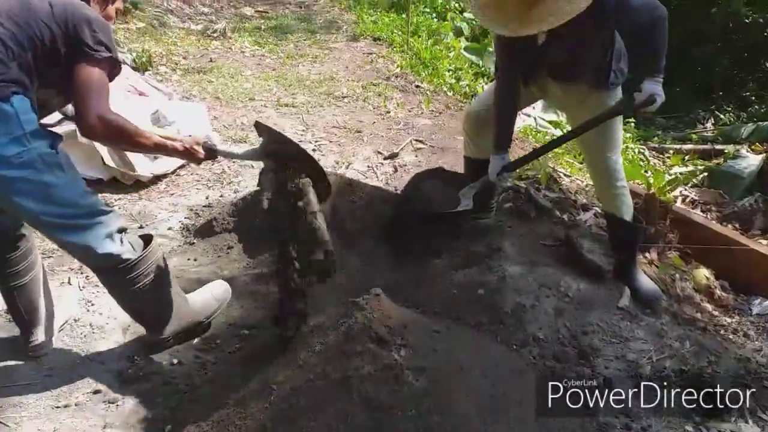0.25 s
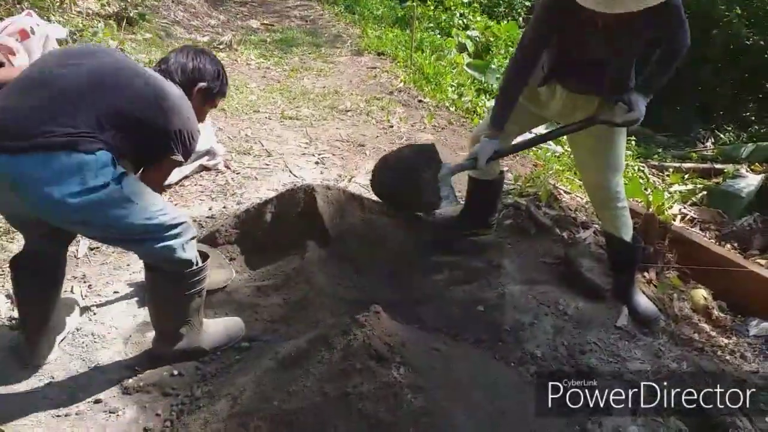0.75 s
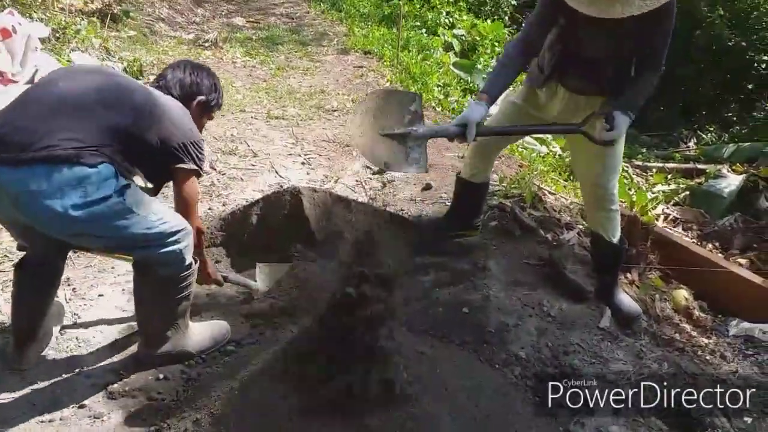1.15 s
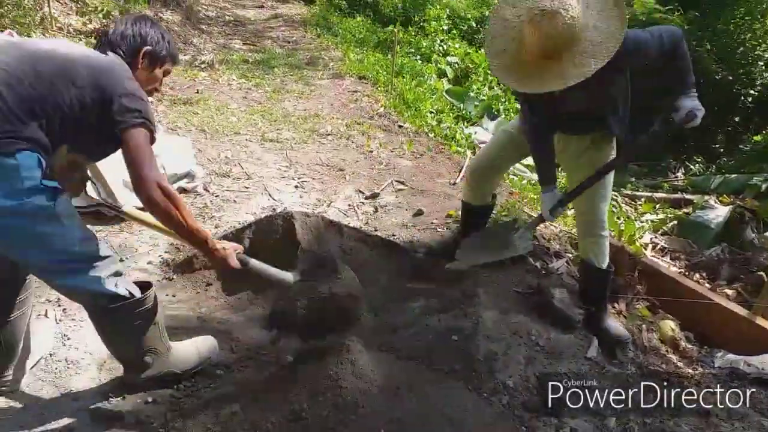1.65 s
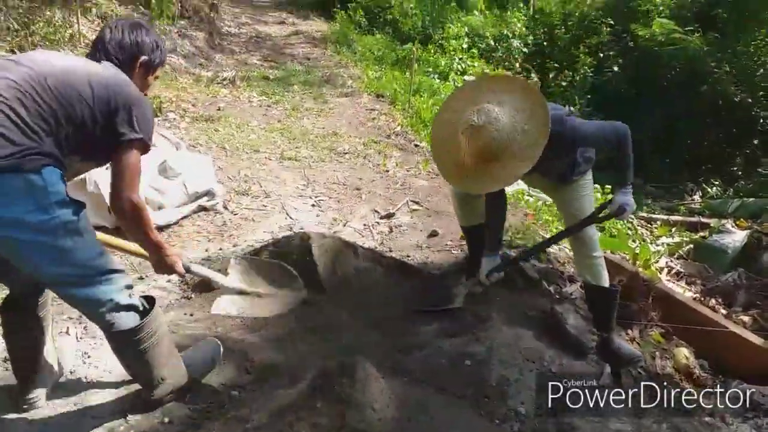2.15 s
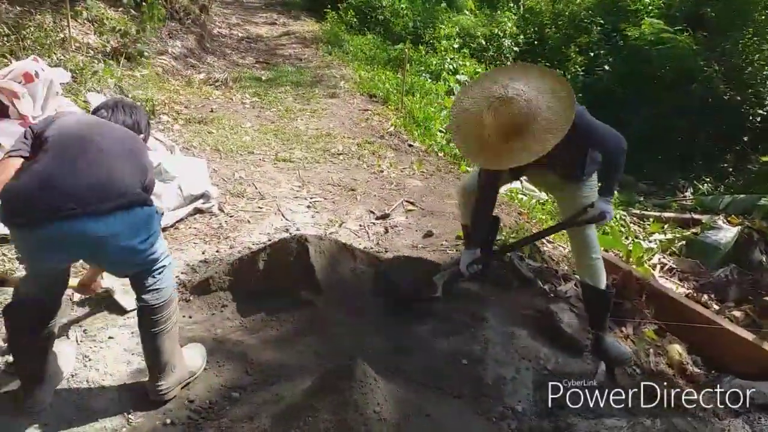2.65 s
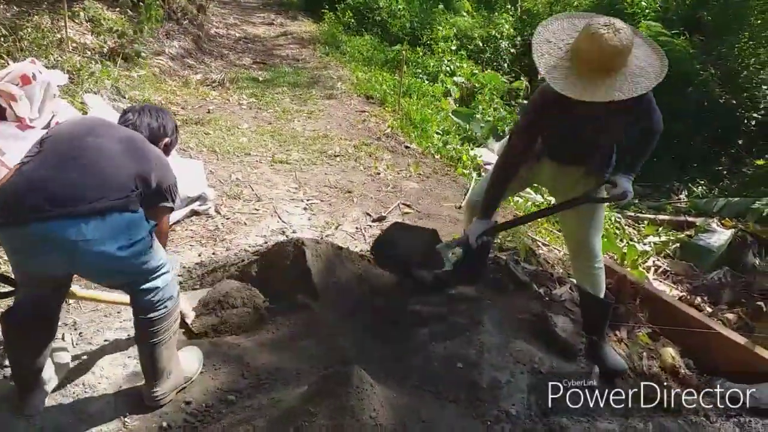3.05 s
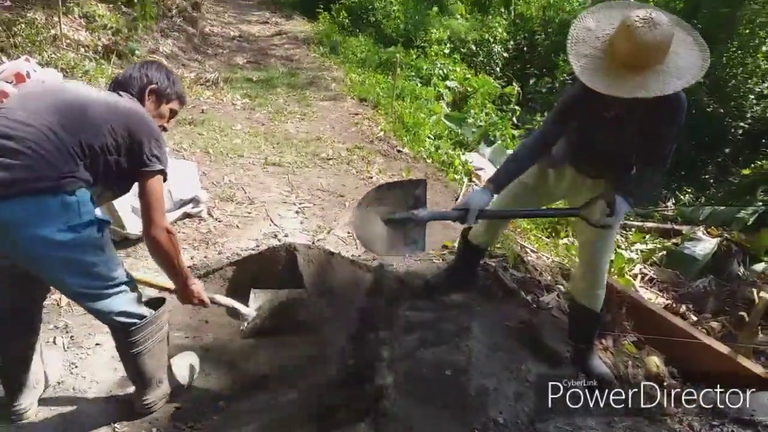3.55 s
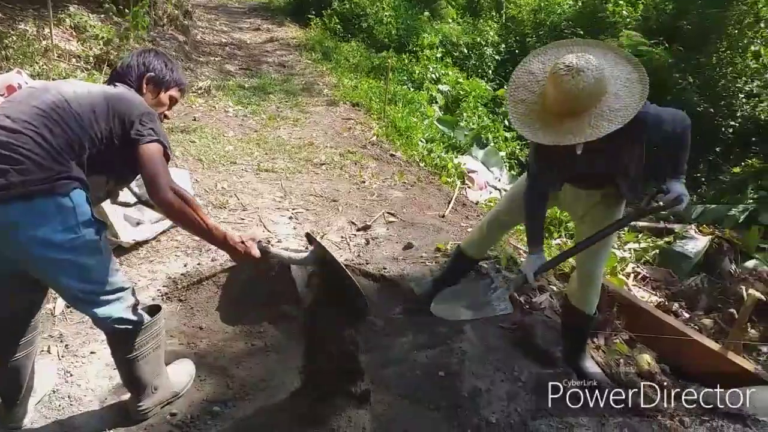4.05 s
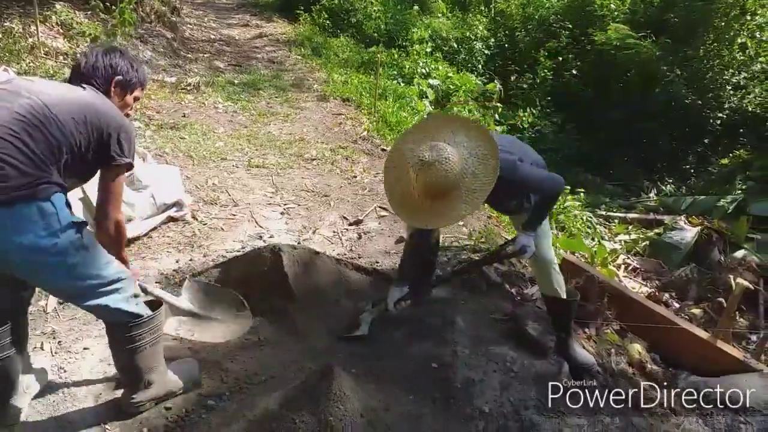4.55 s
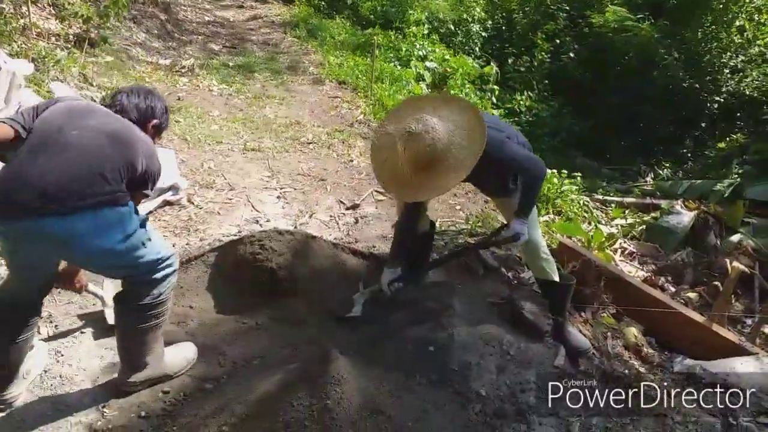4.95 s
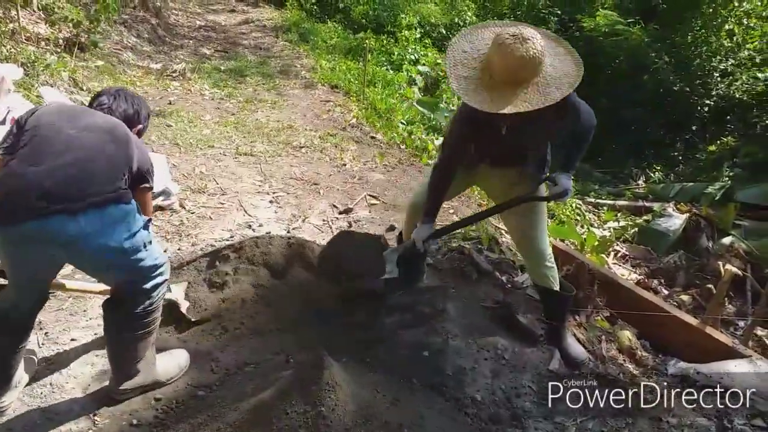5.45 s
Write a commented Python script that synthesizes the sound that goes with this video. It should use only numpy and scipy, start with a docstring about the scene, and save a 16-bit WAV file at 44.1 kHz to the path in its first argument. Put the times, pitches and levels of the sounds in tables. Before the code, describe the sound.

Open air, close microphone, almost no echo. A steady insect hiss with a shriller layer, strongest early and sinking in pitch around 1.5 s, lies over soft air and a faint low engine hum. Soft thuds and a little spilling sand open the scene, with thin wavering bird whistles at 0.4-1.1 s. At 0.9 s a steel shovel bites into gritty sand: a short bright crunch with hard jolts. Thuds and trickles follow to 1.8 s. A second, longer scrape grinds from 1.9 to 2.3 s, swelling and cutting off quickly, with a sharp bird chirp near 2.0 s. Boots shuffle, then a brief scrape comes at 2.75 s. Grit rattles lightly off the blade at 3.1-3.5 s, followed by soft thuds and quiet. A strong, clanking scrape lands at 4.4-4.7 s, high bird chirps at 4.8 s, and a last gritty, ringing push at 4.95-5.3 s before insects remain.

```python
"""Two workers turn a heap of dry sand and cement outdoors with steel shovels.
Insects hiss as filtered noise, air moves and a far engine hums as a sine; soft thuds and spilling sand open the
scene, and faint birds whistle as wavering sines. Then come five pushes, the last two close together: each
blade bites, grinds over random grains that drive its steel modes, and catches on stones with sudden jolts.
Between them loads thud and trickle, boots shuffle, grit rattles off a raised blade and more birds call."""
import sys
import numpy as np
from scipy import signal
from scipy.fft import rfft, irfft, next_fast_len
from scipy.io import wavfile
from scipy.ndimage import uniform_filter1d, map_coordinates

SR = 44100
rng = np.random.default_rng(int(sys.argv[2]) if len(sys.argv) > 2 else 0)


def persist_wave(psi):
    """Save psi, clipped to +-1, as 16-bit WAV."""
    counts = np.round(np.clip(psi, -1, 1) * 32767).astype(np.int16)
    wavfile.write(sys.argv[1], SR, np.atleast_2d(counts).T)


N = 251811

# Motion and relative drive of each push of a blade; brightness applies at the deepest point:
# touch_s, dig_s, deepest_s, lift_s, skim_db, grind_db, sand_db, bright_db, brightening_db_per_s, release_db_per_s
STROKES = [(0.924, 0.941, 1.007, 1.075, -39.5, -29.5, -39, 3, -7, 94),
           (1.924, 2.075, 2.278, 2.337, -40.5, -28.5, -45.5, 0.5, 28, 207),
           (2.733, 2.769, 2.866, 2.817, -59, -28, -41.5, -2.5, 11, 109),
           (4.429, 4.484, 4.558, 4.678, -39, -25, -46, -4.5, 17, 205),
           (4.954, 5.071, 5.181, 5.262, -39.5, -29, -45.5, -7.5, -9, 222)]
# Spectrum of shoved, falling and trodden sand: frequency_hz, density_db
SAND_SPECTRUM = [(82, -62), (140, -8.5), (426, -2.5), (472, 1.5), (586, -4), (715, -4), (864, -10.5),
                 (1100, -7.5), (1430, -27), (2420, -120)]


def amp(db):
    """Decibels to amplitude ratio: 20 dB is a factor of ten."""
    return 10 ** (np.asarray(db) / 20)


def unit(x):
    """Normalise to a root-mean-square of 1."""
    return x / np.sqrt(np.mean(x ** 2) + 1e-20)


def curves(rows):
    """Linear interpolation in time: one curve for each column after the first."""
    s, *columns = np.transpose(rows)
    return [np.interp(np.arange(N) / SR, s, column) for column in columns]


def wobble(rate, size=N):
    """Band-limited random fluctuation: a smooth curve through `rate` random knots a second."""
    knots = rng.standard_normal(int(size * rate / SR) + 4)
    return map_coordinates(knots, [np.arange(size) * rate / SR])


def filtered(x, response):
    """Linear filtering: the spectrum of x times a response to frequency in Hz."""
    size = next_fast_len(len(x) + 8192)
    hz = np.fft.rfftfreq(size, 1 / SR)
    return irfft(rfft(x, size) * response(hz), size)[:len(x)]


def coloured(x, spectrum):
    """Spectral shaping: x weighted by (Hz, dB) points on a log-frequency axis, at rms 1."""
    f, db = np.transpose(spectrum)
    return unit(filtered(x, lambda hz: amp(np.interp(np.log(hz + 1), np.log(f), db))))


def tail(x, t60):
    """Diffuse decay: convolution with noise that falls 60 dB in t60 seconds, at unit energy."""
    t = np.arange(SR // 3) / SR
    response = rng.standard_normal(len(t)) * amp(-60 * t / t60)
    return signal.fftconvolve(x, response / np.linalg.norm(response))[:N]


def shovels():
    """Superposition: two blades push in turn, each push with its own excitation and modes."""
    # tone of each push, set by the blade's angle and depth: frequency_hz, density_db
    tone_1 = [(590, -58), (1000, -37), (1230, -12.5), (1640, 0.5), (1860, -1), (2280, -11), (2450, -3),
              (3220, -6), (4240, -1.5), (4980, -5), (7270, -2), (8250, -17), (9470, -19.5), (12300, -12),
              (15500, -10.5)]
    tone_2 = [(470, -32), (800, -13.5), (1030, -22), (1280, -9.5), (1880, -7), (2030, -5.5), (2800, -2.5),
              (3130, -2.5), (4830, -0.5), (6840, -4), (8650, -23), (12600, -4.5), (15500, -20)]
    tone_3 = [(590, -35), (1000, -30), (1290, -26), (1920, -6.5), (2110, -14), (2310, -8.5), (3220, -7),
              (3530, -9.5), (4870, -2.5), (6190, 0), (8940, -22.5), (13400, -8.5), (15500, -22)]
    tone_4 = [(410, -46), (700, -21), (943, -13), (1020, -15), (1190, -12), (1500, -9), (1780, -4),
              (2310, -4.5), (2800, -1.5), (3400, -8.5), (4080, -2), (6680, -4), (8880, -22), (12100, -5.5),
              (15500, -19)]
    tone_5 = [(470, -33), (800, -5), (1310, -11), (1640, -6), (1810, 3.5), (2210, -8), (2630, -6.5),
              (3170, -5), (4010, 1), (4370, -0.5), (6270, -10.5), (7550, -21.5), (9210, -23),
              (12700, -14.5), (15500, -28)]
    # modes of the two steel blades, levels before ring_db is added: frequency_hz, width_hz, level_db
    blade_a = [(1676, 51, 8), (1780, 43, -35), (1927, 64, -1), (2440, 63, 8), (2710, 52, 4), (2900, 79, 4),
               (3410, 46, -13), (4230, 53, 3.5), (4670, 38, -7), (4800, 55, -2), (4860, 45, -8),
               (5360, 44, -6), (5530, 41, 10), (5980, 90, 3.5), (6900, 67, -13)]
    blade_b = [(973, 28, 7), (1190, 32, 1), (1310, 10, -41), (1746, 56, 5), (2020, 60, 4), (2290, 26, -6),
               (2820, 82, -14), (3132, 23, 8.5), (3270, 36, -11), (3820, 89, -6.5), (4000, 78, -19),
               (4660, 40, -21), (5400, 100, 7), (5350, 140, -7), (6030, 130, -2), (6500, 50, -16)]
    return (push(0, tone_1, blade_a, catch_db=-4.5, ring_db=-9.5, heave_db=-10, flex=0.037, low_db=-2)
            + push(1, tone_2, blade_b, catch_db=-4, ring_db=-6, heave_db=-17.5, flex=0.018, low_db=0.0)
            + push(2, tone_3, blade_a, catch_db=-2.5, ring_db=-13, heave_db=-32, flex=0.055, low_db=-0.8)
            + push(3, tone_4, blade_b, catch_db=-4.5, ring_db=-10.5, heave_db=-21.5, flex=0.15, low_db=0.7)
            + push(4, tone_5, blade_a, catch_db=-3.5, ring_db=-5.5, heave_db=-16, flex=0.47, low_db=-0.7)
            + chatters())


def push(index, tone, blade, catch_db, ring_db, heave_db, flex, low_db):
    """Stick-slip friction: the load on the grit drives the steel's modes and shoves sand ahead."""
    buried, grind, shove, brightness = stroke(index)
    jolt = amp(catch_db) * jolts(index)
    load = np.hypot(grind, jolt)
    slip = amp(1.15 * wobble(60) + 0.84 * wobble(320))

    grains = wandering(coloured(grit(per_second=7000, spread_db=2), tone), depth_db=1.5)
    fine = filtered(grains, lambda hz: 1 / (1 + (5000 / (hz + 1)) ** 12))  # above 5 kHz
    low = filtered(grains, lambda hz: 1 / (1 + (hz / 2300) ** 12))  # below 2.3 kHz
    # a heavier load drives the plate's low modes more
    bending = amp(low_db) * (load / grind.max() + 1e-6) ** flex
    coarse = (grains - fine + (bending - 1) * low) / np.std(grains - fine)
    crunch = coarse + brightness * unit(fine)  # faster sliding cracks more fine grains

    steel = ring(load * slip * crunch, blade, ring_db)
    steel = amp(-1.0) * steel + amp(-7) * tail(steel, t60=0.076)  # the plate's many weak modes
    weight = np.hypot(shove, amp(heave_db) * jolt * buried) * slip  # a jolt in the sand also shakes the load
    return steel + weight * coloured(grit(per_second=2500, spread_db=1), SAND_SPECTRUM)


def stroke(index):
    """Force follows depth: skimming, digging in and lifting set gains of grinding, sand and fine grains."""
    touch, dig, deepest, lift, skim_db, grind_db, sand_db, bright_db, brightening, release = STROKES[index]
    dig_s = 0.0053  # time to make contact, and again to dig in
    swell_db, sag_db_per_s = 6.5, 49  # rise to the deepest point; easing off until the lift
    sand_grows = 1.15  # dB of shoved sand per dB of effort
    turn_s = 0.35  # the blade's angle, and so the brightness, settles this long after the deepest point
    t = np.arange(N) / SR
    touching = np.clip((t - touch) / dig_s, 0, 1)
    buried = np.clip((t - dig) / dig_s, 0, 1)

    swell = np.interp(t, [dig, deepest], [-swell_db, 0])
    # a lift ahead of the deepest point makes this term a constant small boost
    sag = sag_db_per_s * np.clip(t - deepest, 0, lift - deepest)
    effort_db = swell - sag - release * np.maximum(t - lift, 0)

    grind = (touching - buried) * amp(skim_db) + buried * amp(grind_db + effort_db)
    shove = buried * amp(sand_db + sand_grows * effort_db)
    turned_s = np.clip(t - deepest, touch - deepest, turn_s)
    return buried, grind, shove, amp(bright_db + brightening * turned_s)


def jolts(index, rise=0.0018):
    """Impulsive loading: each jolt's force holds, then dies faster while the blade is in sand."""
    # the edge strikes the ground or catches on a stone; from 3.1 to 3.6 s, grit rattles off the raised
    # blade; force before the push's own gain: start_s, level_db
    blows = [(0.925, -32.5), (0.942, -23.5), (0.981, -20), (1.066, -20.5), (1.17, -36.5), (1.938, -34),
             (2.007, -32.5), (2.079, -25), (2.146, -33), (2.252, -24.5), (2.735, -34.5), (2.771, -27.5),
             (2.808, -19.5), (2.869, -29.5), (3.127, -40.5), (3.15, -46), (3.508, -41.5), (4.43, -23.5),
             (4.489, -21), (4.555, -22.5), (4.572, -17), (4.65, -32), (5.073, -25.5), (5.101, -24),
             (5.155, -21.5), (5.242, -35)]
    hold_s = 0.0095  # a stone drags under the edge this long before it slips free
    buried_t60_s, free_t60_s = 0.081, 0.14  # sand damps a blade that is dug in
    touch, dig, _, lift = STROKES[index][:4]
    following = STROKES[index + 1][0] if index + 1 < len(STROKES) else N / SR
    force, t = np.zeros(N + SR), np.arange(SR // 3) / SR
    for s, db in blows:
        moment = s + 0.01  # the blade's state just after the start decides push and damping
        if touch <= moment < following:
            t60 = buried_t60_s if dig <= moment < lift else free_t60_s
            decay = amp(db - 60 * np.maximum(t - hold_s, 0) / t60)
            force[round(s * SR):][:len(t)] += decay * (1 - np.exp(-t / rise))
    return force[:N]


def grit(per_second, spread_db):
    """Random impulse train: grains crack at independent moments, some harder than the rest."""
    cracks = rng.random(N) < per_second / SR
    signs = rng.choice([-1, 1], N)
    hardness = amp(spread_db * np.clip(rng.standard_normal(N), -2, 2))
    return unit(cracks * signs * hardness)


def wandering(x, depth_db):
    """Moving excitation point: travel along the edge favours one region of modes, then another."""
    z = signal.stft(x, nperseg=512)[2]
    across_hz = uniform_filter1d(rng.standard_normal(z.shape), size=5, axis=0)
    field = uniform_filter1d(across_hz, size=7, axis=1)
    return unit(signal.istft(z * amp(depth_db * unit(field)), nperseg=512)[1][:N])


def ring(x, modes, ring_db):
    """Modal resonance: direct contact sound plus the blade's second-order modes."""
    def response(hz):
        steel = 1
        for centre, width, db in modes:
            damping = 1j * hz * width
            steel = steel + amp(db + ring_db) * damping / (centre ** 2 - hz ** 2 + damping)
        band = (hz > 1500) & (hz < 7000)
        return steel / np.sqrt(np.mean(np.abs(steel[band]) ** 2))  # mean power gain 1 in this band
    return filtered(x, response)


def chatters():
    """Stick-slip locking: friction settles on a resonance, a short rough note inside the scrape."""
    # notes of the chattering edge: start_s, length_s, centre_hz, level_db, half_width (ratio to centre)
    notes = [(0.978, 0.021, 4340, -27.5, 0.061), (1.065, 0.029, 2880, -37, 0.08),
             (2.187, 0.044, 1306, -39.5, 0.095), (2.237, 0.039, 2170, -34.5, 0.059),
             (2.837, 0.014, 4870, -25, 0.049), (4.428, 0.038, 2540, -36, 0.08),
             (4.43, 0.128, 1210, -43, 0.0066), (4.637, 0.03, 1900, -30, 0.088),
             (4.678, 0.056, 2420, -37, 0.27), (5.091, 0.026, 4070, -31, 0.065),
             (5.206, 0.091, 3460, -38.5, 0.11)]
    out = np.zeros(N + SR)
    for s, length, centre, db, width in notes:
        size = round(length * SR)
        note = filtered(rng.standard_normal(size), lambda hz: 1 / (1 + ((hz / centre - 1) / width) ** 4))
        out[round(s * SR):][:size] += amp(db) * unit(note) * signal.windows.tukey(size, .5)
    return out[:N]


def thuds(rise=0.00092, sharpness=1.6, knock_db=3, cycles=1.83):
    """Heavily damped impact: loose earth gives a dull push of a cycle or two, then a short crumble."""
    # clods landing and boots treading: start_s, level_db (relative), centre_hz, crumble_t60_s
    landings = [(0.202, -45.5, 1600, 0.11), (0.797, -46, 437, 0.068), (0.803, -41.5, 1680, 0.069),
                (1.107, -36, 371, 0.054), (1.618, -38.5, 330, 0.024), (1.629, -37.5, 313, 0.047),
                (1.668, -45.5, 597, 0.084), (1.677, -44.5, 152, 0.054), (1.749, -44, 1180, 0.033),
                (1.764, -47.5, 139, 0.17), (2.094, -40.5, 484, 0.13), (2.51, -52, 586, 0.17),
                (3.578, -45.5, 610, 0.15), (3.699, -48.5, 600, 0.17), (4.651, -38, 435, 0.092),
                (4.785, -40.5, 310, 0.049), (5.061, -34.5, 1330, 0.019), (5.159, -49, 100, 0.12)]
    out, t = np.zeros(N + SR), np.arange(SR // 3) / SR
    for s, db, centre, t60 in landings:
        def soft(hz):
            return 1j * hz * centre / (sharpness * (centre ** 2 - hz ** 2) + 1j * hz * centre)
        crumble = unit(filtered(rng.standard_normal(len(t)), soft)) * amp(-60 * t / t60)
        knock = np.sin(2 * np.pi * centre * t) * amp(knock_db) * np.exp(-centre * t / cycles)
        out[round(s * SR):][:len(t)] += amp(db) * (knock + crumble) * (1 - np.exp(-t / rise))
    return out[:N]


def spills_and_shuffles(lumpy_db=3):
    """Granular flow: many small impacts in uneven lumps as sand trickles or is stirred by boots."""
    # loose sand falls back on the heap; at 2.4 and 2.92 s, boots shuffle in the sand;
    # level before the fade: start_s, length_s, level_db
    stirrings = [(0.31, 0.16, -61.5), (1.332, 0.087, -51.5), (1.534, 0.18, -52), (2.399, 0.57, -57),
                 (2.92, 0.23, -56), (3.598, 0.15, -58.5)]
    edge_s, fade_db = 0.013, 7  # ramp at either end; fall in level over the whole length
    flow = np.zeros(N + SR)
    for s, length, db in stirrings:
        t = np.arange(round(length * SR)) / SR
        edges = np.clip(np.minimum(t, length - t) / edge_s, 0, 1)
        flow[round(s * SR):][:len(t)] += amp(db - fade_db * t / length) * edges
    lumps = amp(lumpy_db * wobble(70))
    return flow[:N] * lumps * coloured(grit(per_second=1500, spread_db=4), SAND_SPECTRUM)


def birds(echo_db=-9):
    """Frequency modulation: thin whistles glide and waver, with a diffuse echo from the bushes."""
    # bird notes, levels relative: start_s, length_s, start_hz, end_hz, level_db, waver_hz (random scale)
    calls = [(0.431, 0.26, 3340, 3420, -54.5, 99), (0.667, 0.23, 3390, 3210, -51, 128),
             (0.55, 0.56, 2713, 2405, -54, 131), (2.036, 0.055, 4430, 4420, -32.5, 40),
             (4.79, 0.13, 5240, 5290, -45.5, 30), (4.804, 0.159, 4615, 4450, -37.5, 30)]
    out = np.zeros(N + SR)
    for s, length, start, end, db, waver in calls:
        size = round(length * SR)
        pitch = np.linspace(start, end, size) + waver * wobble(396, size=size)
        fading = amp(db + 4.5 - np.linspace(0, 14.5, size))  # each note fades by 14.5 dB as it goes
        whistle = np.sin(2 * np.pi * np.cumsum(pitch) / SR)
        out[round(s * SR):][:size] += fading * signal.windows.tukey(size, .4) * whistle
    return out[:N] + amp(echo_db) * tail(out[:N], t60=0.24)


def insect_chorus():
    """Incoherent summation: countless callers merge into shaped noise of slowly changing level."""
    # spectrum of the chorus: frequency_hz, density_db
    chorus_spectrum = [(880, -17.5), (1500, -8.5), (1700, -9), (1930, -7), (2780, -3.5), (3150, -3),
                       (3410, -2), (4060, -1.5), (4940, -1.5), (8210, -32.5), (11200, -9), (14100, -19),
                       (15500, -26)]
    # its level before small fluctuations: time_s, level_db
    chorus_level = [(0, -52), (0.8, -49.5), (1.9, -52), (2.6, -50.5), (3.5, -51), (3.9, -53.5),
                    (5.71, -53.5)]
    level, = curves(chorus_level)
    return amp(level + 0.29 * wobble(31)) * coloured(rng.standard_normal(N), chorus_spectrum)


def shrill_insects():
    """Frequency scaling: noise read at a varying rate sinks and rises in pitch as it swells and flags."""
    # spectrum before the pitch factor scales it: frequency_hz, density_db
    shrill_spectrum = [(3000, -31.5), (5000, -1), (6300, 2), (7000, -6.5), (8100, -18), (9000, -25),
                       (11000, -10.5), (13400, -5), (15500, -15.5), (17000, -40)]
    # swelling and flagging of the call: time_s, level_db, pitch_factor (ratio)
    shrill_course = [(0, -48.5, 1.166), (0.87, -48.5, 1.16), (1.5, -46.5, 1.01), (1.9, -63.5, 0.96),
                     (2.45, -50, 1.05), (3.3, -51, 1.016), (4.3, -69, 0.95), (5.35, -63, 1),
                     (5.71, -55.5, 0.99)]
    level, pitch = curves(shrill_course)
    noise = coloured(rng.standard_normal(N), shrill_spectrum)
    return amp(level) * map_coordinates(noise, [np.cumsum(pitch)], mode="wrap")


def breeze():
    """Random pressure fluctuation: moving air as low, gently unsteady noise."""
    # spectrum of the air: frequency_hz, density_db
    air_spectrum = [(15, -59), (25, -35), (40, -10), (93, -1.5), (124, -7.5), (306, -14), (344, -10),
                    (417, -8), (468, -12), (515, -9), (2500, -17), (3250, -49), (5500, -120)]
    return amp(-62 + 1.3 * wobble(7.8)) * coloured(rng.standard_normal(N), air_spectrum)


def far_engine(engine_hz=100.0):
    """Periodic firing: a distant hum reduced to one sine with slight drift in pitch and level."""
    # level of the hum before small fluctuations: time_s, level_db
    engine_level = [(0, -71), (0.7, -63.5), (1.1, -54.5), (1.55, -55.5), (2.0, -63.5), (2.6, -61),
                    (3.8, -76), (4.4, -66.5), (5.71, -67.5)]
    level, = curves(engine_level)
    firing = 2 * np.pi * np.cumsum(engine_hz + 1.25 * wobble(2.5)) / SR
    return amp(level + 0.73 * wobble(5.8)) * np.sin(firing)


def scene():
    """Outdoor propagation: open ground gives the work only a faint, short echo."""
    work = shovels() + thuds() + spills_and_shuffles()
    echo = amp(-19.5) * tail(work, t60=0.22)
    background = insect_chorus() + shrill_insects() + breeze() + far_engine()
    return (work + echo + birds() + background)[None]


def record(dry, low_hz=55, top_hz=15700):
    """Band limitation: a second-order high-pass thins deep bass, and nothing remains above top_hz."""
    def response(hz):
        return (hz < top_hz) * hz ** 2 / np.hypot(hz ** 2, low_hz ** 2)
    return np.array([filtered(channel, response) for channel in dry])


dry = scene()
out = record(dry)
persist_wave(out)
```